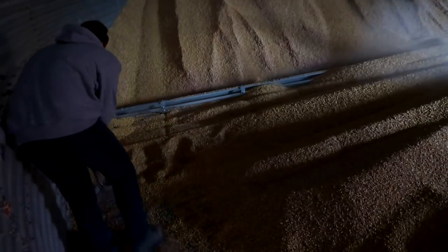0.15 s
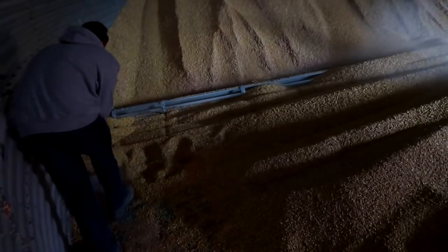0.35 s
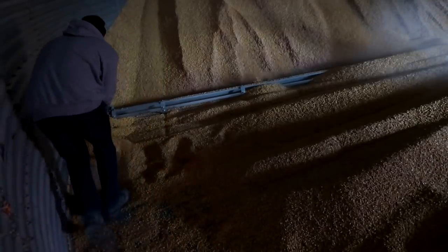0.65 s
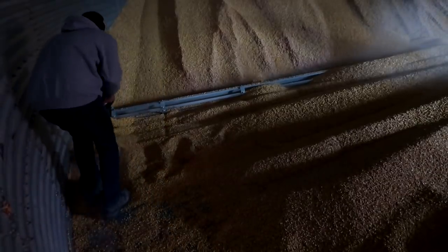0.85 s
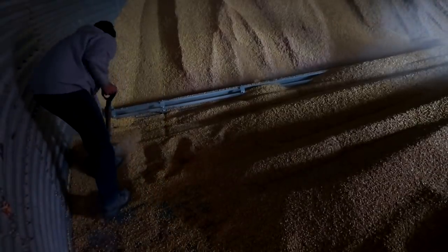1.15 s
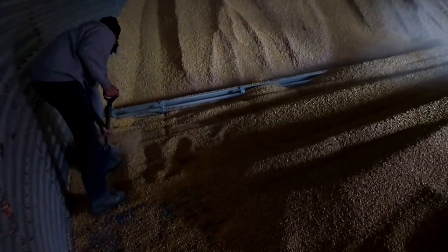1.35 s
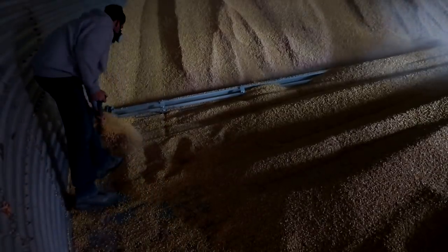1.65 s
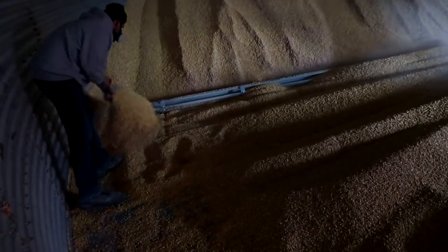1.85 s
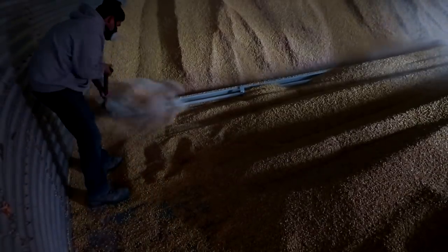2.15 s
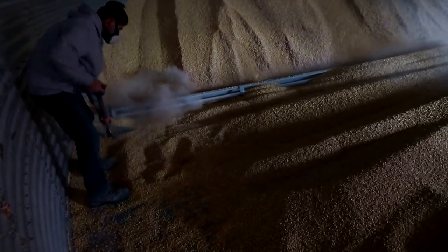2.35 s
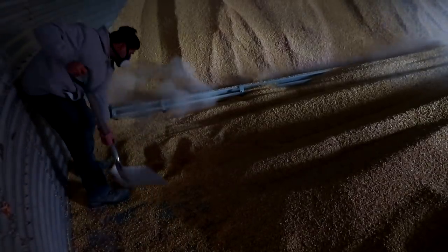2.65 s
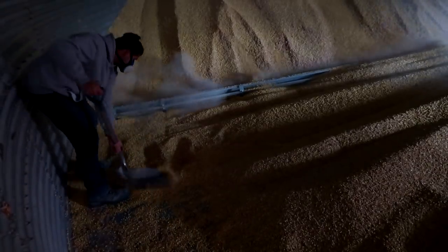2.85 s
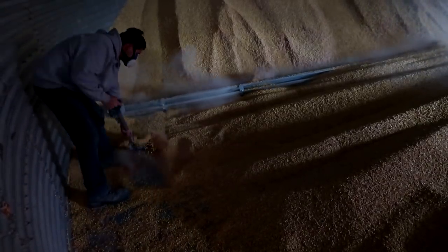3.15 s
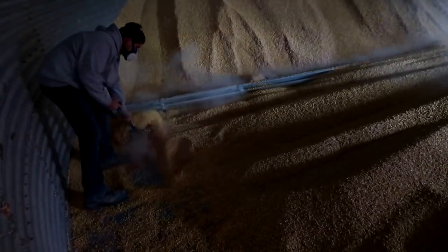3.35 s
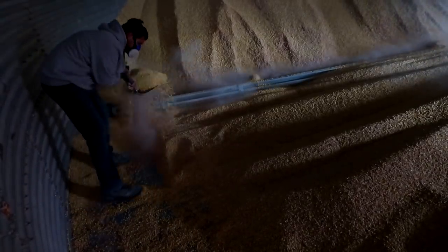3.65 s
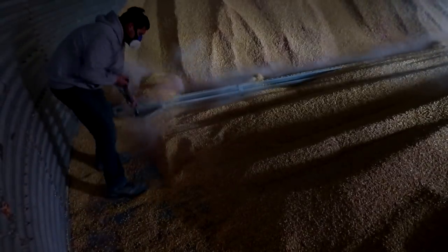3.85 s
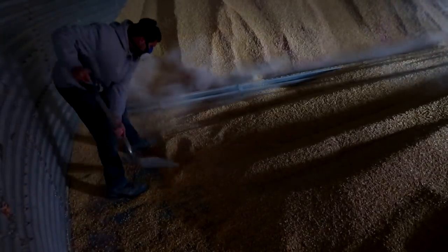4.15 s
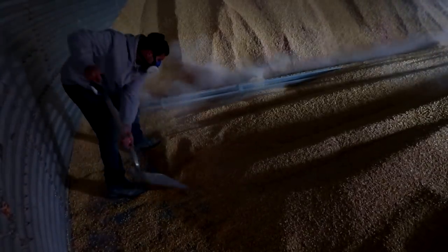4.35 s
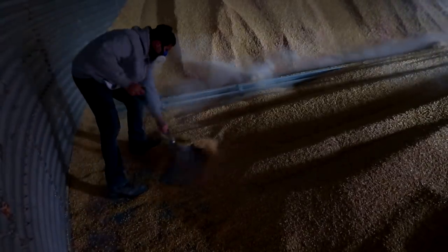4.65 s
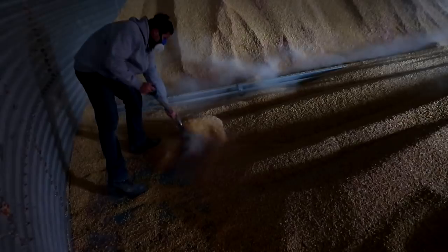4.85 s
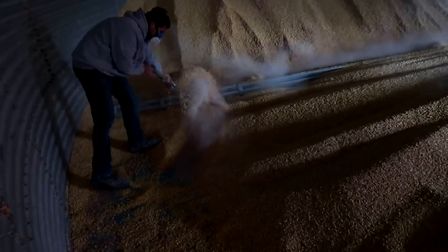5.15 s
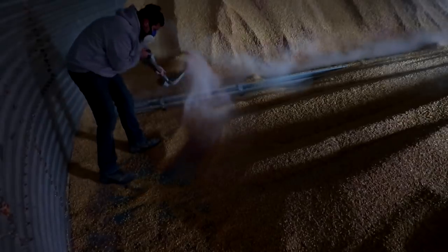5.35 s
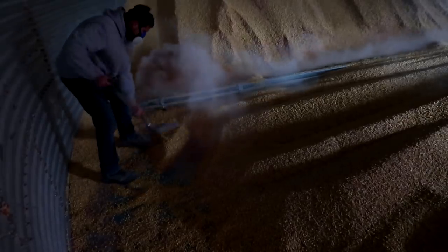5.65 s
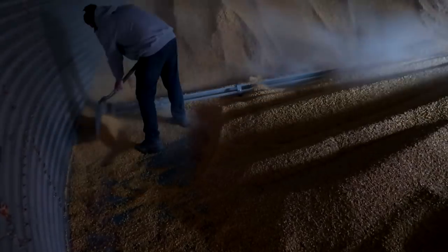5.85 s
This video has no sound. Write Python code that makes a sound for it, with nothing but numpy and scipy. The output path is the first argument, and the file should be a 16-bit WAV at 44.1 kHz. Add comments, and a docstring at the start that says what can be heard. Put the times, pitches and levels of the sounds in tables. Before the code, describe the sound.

Dense, steady rattle of dry corn over a low, uneven machine rumble in a resonant metal bin. Close by, a shovel bites gritty grain, knocks, then sends kernels off its blade in a swift bright hiss; this scrape-and-throw happens again and again, three throws in all. Brief rough metal rubs chirp in between. Close stereo pickup, with wide airy treble and centred bass; everything suddenly becomes quieter at the very end.

```python
"""A sweep auger drags shelled corn across the floor of a steel bin: a low motor hum that swells, fades and
wavers, shaped noise for the rumble, a drifting wall resonance, and dense random clicks for the rattle. A shovel
scrapes into the heap and throws kernels that hiss off the blade (clicks and noise in moving bands). Dull knocks
are short ringing modes; steel rubs are wavering squeaks with noise. A close pair of microphone ports hears the
bass nearly alike and the treble mostly in opposition. Near the end the whole level drops abruptly."""
import sys
import numpy as np
from scipy import signal
from scipy.fft import rfft, irfft
from scipy.io import wavfile
from scipy.ndimage import uniform_filter1d

SR = 44100
rng = np.random.default_rng(int(sys.argv[2]) if len(sys.argv) > 2 else 0)


def to_wav(s):
    """Save 16-bit WAV."""
    ch = np.atleast_2d(s).T  # columns
    pcm = np.round(np.clip(ch, -1, 1) * 32767)  # PCM
    wavfile.write(sys.argv[1], SR, pcm.astype(np.int16))


N = 264864  # samples, about 6 s
# frequencies and frame times of the moving colours
HZ, TIMES = np.fft.rfftfreq(512, 1 / SR)[:, None], np.arange(N // 128 + 3) * 128 / SR

# Machine levels before the beat and throb: t/s, trough rumble/dB, deep rumble/dB, rattle/dB
MACHINE_LEVELS = [(0.0, -24.5, -29, -26.5), (0.27, -21.5, -35, -24.5), (0.6, -24, -32.5, -25.5),
                  (0.87, -22, -29, -25.5), (1.22, -20.5, -26, -21.5), (1.6, -21, -28, -22.5),
                  (1.99, -20, -29.5, -22.5), (2.25, -23, -33, -23.5), (2.47, -22, -25, -24),
                  (2.76, -19, -28, -23.5), (2.95, -25, -32, -22.5), (3.2, -22, -35, -24.5),
                  (3.53, -29.5, -32, -30), (3.74, -22, -32, -24), (3.88, -27, -28, -24),
                  (4.44, -19, -26, -25), (4.53, -28, -37, -25), (4.72, -20.5, -33, -23),
                  (4.91, -27.5, -30, -27), (5.15, -22.5, -28, -26), (5.35, -23.5, -23.5, -23.5),
                  (5.58, -22, -27, -23.5), (5.76, -20.5, -22.5, -22.5)]
# Wall resonance and motor hum before their throb: t/s, wall level/dB, wall f/Hz, hum level/dB
WALL_AND_HUM = [(0.0, -25, 320, -38), (0.14, -23, 325, -39), (0.33, -42, 319.6, -45), (0.53, -24, 318, -41),
                (0.77, -30, 326.7, -27), (1.05, -27.5, 343, -34), (1.4, -22.5, 343, -25),
                (1.72, -24.5, 331.2, -25.5), (1.9, -29, 326, -38), (2.03, -27, 325.3, -25),
                (2.21, -26, 320, -35), (2.45, -23.5, 329, -25.5), (2.74, -26, 319.5, -24),
                (2.95, -25, 324.3, -30.5), (3.22, -33, 329.2, -39), (3.5, -37.5, 320.2, -29),
                (3.9, -29.5, 328.6, -29.5), (4.27, -24, 320.8, -28.5), (4.65, -34, 320.7, -34),
                (4.95, -42, 315.7, -30.5), (5.3, -26.5, 317, -33), (5.55, -37, 324.3, -28),
                (5.78, -22.5, 325.4, -26.5)]
# Colour of bin walls and trough: f/Hz, relative level per Hz/dB
RUMBLE_COLOUR = [(12, -46), (20, -8), (38, -5.5), (70, 2.5), (90, 3), (108, -0.5), (126, 0), (146, -5),
                 (259, -5.5), (327, -5), (387, -8), (481, -6), (544, -13.5), (800, -23), (1040, -59),
                 (1760, -120)]
# Colour of kernels on steel: f/Hz, relative level per Hz/dB
RATTLE_COLOUR = [(300, -9), (600, -1.5), (900, -2.5), (1150, -2.5), (1500, -2), (2100, -2.5), (3000, -6.5),
                 (3700, -10), (4500, -8.5), (6500, -11), (10000, -17.5), (12500, -20), (15000, -31.5)]
# The auger's shield rings in the rattle: f/Hz, width/Hz, boost/dB
SHIELD_RINGS = [(1091, 57, 7), (3700, 200, 4.5), (8000, 170, 1.5)]
# The blade pushed into the heap: start/s, attack/s, length/s, level/dB, bite/dB, sag/dB, hiss f at the bite/Hz,
# hiss f when full/Hz, hiss/dB, brightness/(dB per octave), its change over the stroke/(dB per octave)
SCRAPE_STROKES = [(-.1, 0.022, 0.4, -21, 4, -3.5, 2450, 2260, 4, -0.5, -5),
                  (2.764, 0.081, 0.42, -19, 5.5, -2.5, 6600, 2120, 3, 1.5, -3),
                  (4.43, 0.022, 0.53, -19, 3, -10, 3730, 3700, 4.5, 2, -6)]
# Colour of the blade in the heap: f/Hz, relative level per Hz/dB
BLADE_COLOUR = [(300, -18), (600, 0.5), (1000, -2), (1500, -1), (2200, -1.5), (3000, -3), (4000, -3),
                (5000, -9.5), (6500, -3.5), (8000, -13.5), (10000, -8.5), (12500, -13.5), (15000, -34)]
# Dull knocks: t/s, level/dB, extra level of the modes above 1000 Hz/dB
KNOCK_TIMES = [(.477, -20, 12), (0.5497, -2, 0), (.5825, -13.5, 7.5), (.6365, -16.5, 9.5), (1.430, -6, -4),
               (2.884, -13, -5), (3.087, -9.5, 1.5), (3.198, -5.5, 0), (4.428, -13, -7), (5.703, -9, -8)]
# Ringing modes of a knock: f/Hz, level/dB, time to fall 60 dB/s
KNOCK_RINGS = [(501, 1.5, 0.029), (682, -7.5, 0.025), (856, -9, 0.023), (1230, -1.5, 0.0063),
               (2328.4, -4.5, 0.0095), (2710, -3.5, 0.0076), (3350, -17, 0.0041)]
# Steel rubs steel (flighting on its shield, blade on the floor) in short rough chirps:
# t/s, level at the peak/dB, f/Hz, length/s (heard for three of these), width/Hz
STEEL_RUBS = [(0.939, -18.5, 1880, 0.034, 300), (0.999, -31, 1103, .025, 150),
              (1.047, -23, 1934, 0.045, 594), (1.08, -33, 3700, 0.039, 200), (1.165, -24, 1140, 0.019, 200),
              (1.286, -26, 1130, .025, 170), (1.29, -33, 3747, 0.11, 260), (1.365, -24, 1420, 0.04, 250),
              (1.485, -30, 1140, 0.032, 199.9), (1.538, -25, 1160, 0.026, 200),
              (1.691, -26, 2170, 0.026, 261), (1.724, -20.5, 1860, 0.027, 400),
              (1.815, -22, 2120, 0.051, 450), (1.86, -27, 1114, 0.022, 169.6),
              (1.967, -31, 3810, 0.038, 260), (2.026, -28, 1177, 0.031, 200),
              (2.108, -23, 1950, 0.047, 504), (2.495, -29, 1806, 0.03, 260), (2.838, -31, 2120, 0.02, 300),
              (2.861, -21, 1320, 0.03, 299.3), (3.1, -23.5, 1300, 0.027, 300),
              (3.126, -19.5, 945, 0.032, 170), (4.459, -15.5, 1036, 0.049, 190),
              (4.551, -23, 1070, 0.053, 190), (4.665, -24, 1110, .032, 200)]
# Kernels trickle, rush off the swung blade, then land: peak t/s, rush level/dB, hiss f/Hz, hiss width/octaves,
# hold/s, trickle lead/s, trickle level/dB, trickle f/Hz, landing delay/s, landing level/dB, landing spread/s,
# change of the wide spray above 9000 Hz/dB
KERNEL_THROWS = [(2.08, -23, 5290, 0.31, 0.074, 0.1, -29, 3600, 0.17, -27, 0.064, -0.5),
                 (3.857, -21, 5000, 0.42, 0.018, 0.083, -25, 3700, 0.14, -23.5, .04, -3),
                 (5.447, -19, 3950, 0.38, 0.053, 0.14, -30.5, 3480, 0.15, -27, 0.055, -1)]
# Colour of the wide part of the thrown hiss: f/Hz, relative level per Hz/dB
SPRAY_COLOUR = [(1000, -41), (2400, -1), (6500, -11), (8000, -20), (10000, -50), (12500, -6.5),
                (15000, -26)]
# The two ports, before each source's trim: f/Hz, level heard in opposition over level heard alike/dB
PORT_OPPOSITION = [(40, -52), (80, -52), (125, -50), (250, -26), (500, -21), (1000, -15), (2700, -15),
                   (3500, -7.5), (4500, -3), (6000, 1), (7500, 4), (8500, 7), (9700, 26), (10500, 21.5),
                   (11500, 5.5), (13000, 3)]
# How much of the opposed sound is the alike sound shifted in phase: f/Hz, likeness/(0-1), shift/radians
AUGER_LIKENESS = [(150, 0.1, -3), (304, 1, -6), (600, 0.4, 2.5), (850, .1, -1), (1100, 0.8, -2.5),
                  (2200, 0.4, -1.5), (3500, 0.03, -2.5)]
SHOVEL_LIKENESS = [(300, .4, -1), (1000, 0.69, .3), (2200, .1, 1.4), (4000, .6, 1.3), (5500, 0.62, 1.1),
                   (7000, .6, 1.4), (10000, .3, 1.5), (12500, .1, 1.5)]
# The drop near the end: t when it is complete/s, change of level/dB
LEVEL_DROP = (5.795, -14)

TURNS_HZ = 8.2  # average turns of the flighting a second
THROB_HZ = 10  # fastest part of the uneven throb as the flighting loads and empties
TROUGH_THROB_DB, WALL_THROB_DB = 1.0, 0.5
WALL_WIDTH_HZ = 58
HUM_HZ = 119.4  # about twice the mains frequency
HUM_WAVER_DB, HUM_WAVER_RAD = 1.6, 0.39
BITE_S = 0.0092  # a short peak as the edge meets the kernels
FILL_AT, FILL_SPAN = 0.35, 0.17  # parts of a stroke; the hiss moves as the blade fills
RELEASE_DB_PER_S, SCRAPE_HISS_OCT = 195, 0.43
SQUEAK_SHARE = 0.45  # share of a rub that is a wavering squeak; the rest is noise
OCTAVE_DB = -11.5  # level of the squeak's octave
TRICKLE_OCT, LANDING_OCT, LANDING_HZ = 0.57, 1, 4130  # widths and centre of the hiss
START_DB_PER_S = 142  # the trickle sets in
SWELL_DB_PER_S, CUT_DB_PER_S = 224, 550  # the rush swells fast and stops short
LINGER_DB_PER_S = 150  # stragglers leave the blade after the rush
EDGE_HZ = 15090  # upper band limit


def amp(db):
    """Turns decibels into a plain multiplier."""
    return 10 ** (np.asarray(db) / 20)


def evened(x):
    """Scales a sound to an average strength (rms) of 1."""
    return x / np.sqrt(np.mean(x ** 2) + 1e-20)


def read(points, hz):
    """Reads a frequency curve, joining its points by straight lines over log frequency."""
    f, value = np.transpose(points)
    return np.interp(np.log(hz + 1), np.log(f + 1), value)


def band(x, hz, width):
    """A two-pole resonance passes its own pitch at gain 1 and weakens the rest."""
    return signal.lfilter(*signal.iirpeak(hz, hz / width, SR), x)


def hump(centre_hz, octaves):
    """A wide bump over frequency, about 1 at a centre that may move."""
    distance = np.log2((HZ + 1) / centre_hz)
    return np.exp(-abs(distance / octaves) ** 3)


def kernels(per_s, spread_db, wash):
    """Two unrelated showers of clicks, a few large, over the wash that the bin returns."""
    hits = rng.random((2, N)) < per_s / SR
    size = amp(spread_db * np.minimum(rng.exponential(1, (2, N)), 5)) * hits
    clicks = evened(size * rng.choice([-1., 1.], (2, N)))
    return np.sqrt(1 - wash) * clicks + np.sqrt(wash) * rng.standard_normal((2, N))


def coloured(x, colour_db, level_db, patchy_db, fine_db):
    """Gives x a moving colour of power 1, a level, wide patches where kernels bunch and small random
    unevenness, narrow in frequency and short in time."""
    wide, fine = rng.standard_normal((len(TIMES), len(HZ), 2)).T
    wide = evened(uniform_filter1d(uniform_filter1d(wide, size=9, axis=0), size=12, axis=1))
    fine = evened(uniform_filter1d(uniform_filter1d(fine, size=2, axis=0), size=8, axis=1))
    colour = amp(colour_db) * np.ones(wide.shape)
    colour /= np.sqrt(np.mean(colour ** 2, axis=0))
    gain = colour * amp(level_db + patchy_db * wide + fine_db * fine)
    z = signal.stft(x, nperseg=512, noverlap=384)[2]
    return signal.istft(z * gain[:, :z.shape[2]], nperseg=512, noverlap=384)[1][:, :N]


def turning(t):
    """One beat a turn of the flighting, its pace wandering."""
    drift = sum(np.sin(2 * np.pi * (f * t + rng.random())) / f for f in np.geomspace(.3, 3, 8))
    return np.sin(2 * np.pi * TURNS_HZ * t + evened(drift))


def throb(t):
    """An uneven slow swing of rms 1: sines with random starts, up to the throbbing rate."""
    rates = np.geomspace(2.5, THROB_HZ, num=20)
    return evened(sum(np.sin(2 * np.pi * (f * t + rng.random())) / np.sqrt(f) for f in rates))


def wall(hz):
    """Wall resonance: noise smoothed twice and shifted up to a drifting pitch makes a rough tone."""
    r = np.exp(-np.pi * WALL_WIDTH_HZ / SR)
    re, im = signal.lfilter([1], np.convolve([1, -r], [1, -r]), rng.standard_normal((2, 2, N)))
    carrier = np.exp(2j * np.pi * np.cumsum(hz) / SR)
    return evened(((re + 1j * im) * carrier).real)


def motor_hum(t):
    """One sine that swells and fades, its level and phase wavering with two separate throbs."""
    at, _, _, hum_db = np.transpose(WALL_AND_HUM)
    waver_db = np.interp(t, TIMES, HUM_WAVER_DB * throb(TIMES))
    waver_rad = np.interp(t, TIMES, HUM_WAVER_RAD * throb(TIMES))
    hum = np.sqrt(2) * np.sin(2 * np.pi * HUM_HZ * t + waver_rad)
    return amp(np.interp(t, at, hum_db) + waver_db) * hum


def wall_ring(t):
    """The wall resonance follows its pitch and level, and throbs."""
    at, wall_db, wall_hz, _ = np.transpose(WALL_AND_HUM)
    level_db = np.interp(t, at, wall_db) + np.interp(t, TIMES, WALL_THROB_DB * throb(TIMES))
    return wall(np.interp(t, at, wall_hz)) * amp(level_db)


def rumble(t, beat):
    """Noise split near 170 Hz: a deep part, and a trough part that beats with the turns and throbs."""
    s, trough_db, deep_db, _ = np.transpose(MACHINE_LEVELS)
    hz = np.fft.rfftfreq(N, 1 / SR)
    z = rfft(rng.standard_normal((2, N))) * amp(read(RUMBLE_COLOUR, hz))
    lows = 1 / (1 + (hz / 170) ** 6)  # share of power that is deep
    deep = evened(irfft(z * np.sqrt(lows), N))
    trough = evened(irfft(z * np.sqrt(1 - lows), N))
    swing_db = np.interp(t, TIMES, 0.41 * beat + TROUGH_THROB_DB * throb(TIMES))
    return deep * amp(np.interp(t, s, deep_db)) + trough * amp(np.interp(t, s, trough_db) + swing_db)


def rattle(beat):
    """Kernels strike steel, coloured by the shield's rings and beating with the turns."""
    s, _, _, rattle_db = np.transpose(MACHINE_LEVELS)
    rings_db = sum(db * np.exp(-((HZ - f) / width) ** 2) for f, width, db in SHIELD_RINGS)
    colour_db = read(RATTLE_COLOUR, HZ) + rings_db
    level_db = np.interp(TIMES, s, rattle_db) + 0.14 * beat
    return coloured(kernels(5000, 2.2, 0.55), colour_db, level_db, patchy_db=1.37, fine_db=1.5)


def auger():
    """Motor, bin wall, trough and kernels sound together; rumble and rattle share one beat."""
    t, beat = np.arange(N) / SR, turning(TIMES)
    return motor_hum(t) + wall_ring(t) + rumble(t, beat) + rattle(beat)


def strokes():
    """Level, hiss and brightness of the strongest stroke: attack, bite, slow sag, release."""
    columns = np.array(SCRAPE_STROKES).T[:, :, None]
    start, attack, length, db, bite_db, sag_db, bite_hz, full_hz, hiss_db, tilt_db, dull_db = columns
    s = TIMES - start
    done = np.clip(s / length, 0, 1)
    bite = np.exp(-((s - attack - BITE_S / 2) / BITE_S) ** 2)
    level_db = db + bite_db * bite + sag_db * done ** 2
    level_db += 20 * np.log10(np.clip(s / attack, 1e-6, 1))
    level_db -= RELEASE_DB_PER_S * np.maximum(s - length, 0)
    now, frame = level_db.argmax(axis=0), np.arange(len(TIMES))
    filled = (1 / (1 + np.exp((FILL_AT - done) / FILL_SPAN)))[now, frame]
    bite_hiss = hump(bite_hz[now, 0], SCRAPE_HISS_OCT)
    full_hiss = hump(full_hz[now, 0], SCRAPE_HISS_OCT)
    hiss = (1 - filled) * bite_hiss + filled * full_hiss
    return level_db[now, frame], hiss_db[now, 0] * hiss, (tilt_db + dull_db * done)[now, frame]


def scrapes():
    """The blade grinds through the heap: clicks and wash whose colour changes as it fills."""
    level_db, hiss_db, tilt_db = strokes()
    octaves = np.log2(np.clip(HZ, 700, 13000) / 2000)
    colour_db = read(BLADE_COLOUR, HZ) + tilt_db * octaves + hiss_db
    return coloured(kernels(4000, 3.5, 0.73), colour_db, level_db, patchy_db=1.24, fine_db=2.14)


def knocks():
    """A blow rings short modes in alternating sense, the upper ones more on bright blows."""
    out, t = np.zeros(N), np.arange(1500) / SR
    for s, db, bright_db in KNOCK_TIMES:
        for k, (hz, mode_db, t60) in enumerate(KNOCK_RINGS):
            level_db = db + mode_db + (hz > 1000) * bright_db - 60 * t / t60
            swell = 1 - np.exp(-t * hz * 0.93)  # mostly within a cycle
            ring = amp(level_db) * np.sin(2 * np.pi * hz * t) * swell
            out[round(s * SR):][:len(t)] += (-1) ** k * ring
    return np.array([out, -out])


def rubs():
    """Each rub is a wavering squeak with its octave and a puff of noise at the same pitch."""
    out = np.zeros((2, N))
    for s, db, hz, length, width in STEEL_RUBS:
        u = np.arange(round(3 * length * SR)) / (length * SR)
        noise, slip = rng.standard_normal((2, 2, len(u)))
        waver = evened(uniform_filter1d(slip, size=100))
        phase = 2 * np.pi * np.cumsum(hz + width / 2 * waver, axis=1) / SR
        squeak = np.sqrt(2) * (np.sin(phase) + amp(OCTAVE_DB) * np.sin(2 * phase))
        puff = evened(band(noise, hz, width))
        mix = np.sqrt(SQUEAK_SHARE) * squeak + np.sqrt(1 - SQUEAK_SHARE) * puff
        rise_and_fall = 3 * u * np.exp(1 - 3 * u)  # peaks at a third of the length
        out[:, round(s * SR):][:, :len(u)] += amp(db) * mix * rise_and_fall
    return out


def throw_power():
    """Power over frequency and time of each trickle, rush and landing."""
    power = 1e-12
    for (peak, db, hz, octaves, hold, lead, trickle_db, trickle_hz,
         after, landing_db, lasts, fizz_db) in KERNEL_THROWS:
        spray = amp(read(SPRAY_COLOUR, HZ) + fizz_db * (HZ > 9000)) ** 2
        early, late = np.maximum(peak - TIMES, 0), np.maximum(TIMES - peak - hold, 0)
        trickle = hump(trickle_hz, TRICKLE_OCT) + spray
        trickle_db = trickle_db - START_DB_PER_S * np.maximum(early - lead, 0) - LINGER_DB_PER_S * late
        rush = hump(hz, octaves) + amp(-4) ** 2 * spray
        rush_db = db - SWELL_DB_PER_S * early - CUT_DB_PER_S * late
        landing = hump(LANDING_HZ, LANDING_OCT) + spray
        landing_gain = amp(landing_db) * np.exp(-((TIMES - peak - after) / lasts) ** 2)
        parts = [(trickle, amp(trickle_db)), (rush, amp(rush_db)), (landing, landing_gain)]
        power = power + sum(colour / colour.mean() * gain ** 2 for colour, gain in parts)
    return power


def throws():
    """Thrown kernels hiss in bands that follow the trickle, rush and landing."""
    power = throw_power()
    colour_db, level_db = 10 * np.log10(power), 10 * np.log10(power.mean(axis=0))
    return coloured(kernels(6000, 3.0, 0.27), colour_db, level_db, patchy_db=1.0, fine_db=1.0)


def ports(pair, side, opposed_db):
    """A source arrives alike at both ports and, by its direction and the bin's scatter, in opposition."""
    (direct, scatter), hz, side = rfft(pair), np.fft.rfftfreq(N, 1 / SR), np.array(side)
    ratio = amp(read(PORT_OPPOSITION, hz))
    likeness = np.clip(read(side[:, :2], hz), 0, 1)
    shifted = likeness * np.exp(1j * read(side[:, ::2], hz)) * direct
    opposed = amp(opposed_db) * ratio * (shifted + np.sqrt(1 - likeness ** 2) * scatter)
    alike, opposed = irfft([direct, opposed] / np.sqrt(1 + ratio ** 2), N)
    return np.array([alike + opposed, alike - opposed])


def scene():
    """The machine fills the bin; the shovel works close by, to one side."""
    machine = ports(auger() + rubs(), AUGER_LIKENESS, -0.2)
    shovel = ports(scrapes() + knocks() + throws(), SHOVEL_LIKENESS, 0.13)
    return machine + shovel


def record(dry):
    """The level drops within a few milliseconds; then a filter removes the highest treble."""
    drop_s, drop_db = LEVEL_DROP
    fall = np.clip((np.arange(N) / SR - drop_s) / 0.0039 + 1, 0, 1)
    low_pass = signal.firwin(1023, EDGE_HZ, window=("kaiser", 9), fs=SR)
    return signal.oaconvolve(dry * amp(drop_db * fall), low_pass[None], "same")


dry = scene()
out = record(dry)
to_wav(out)
```